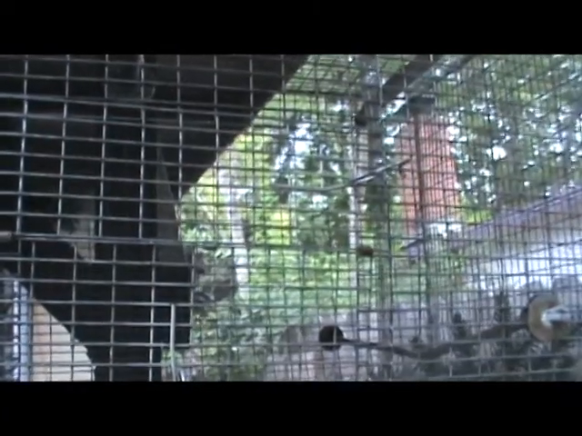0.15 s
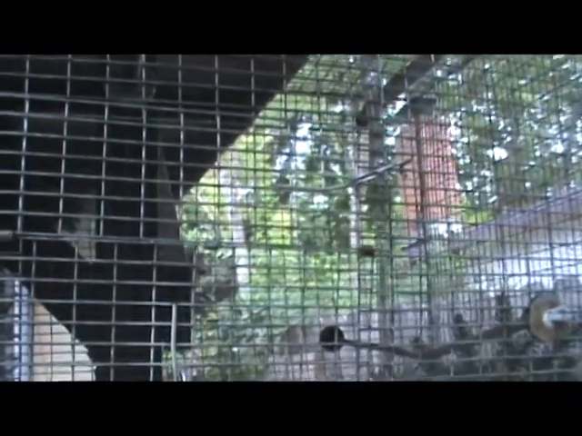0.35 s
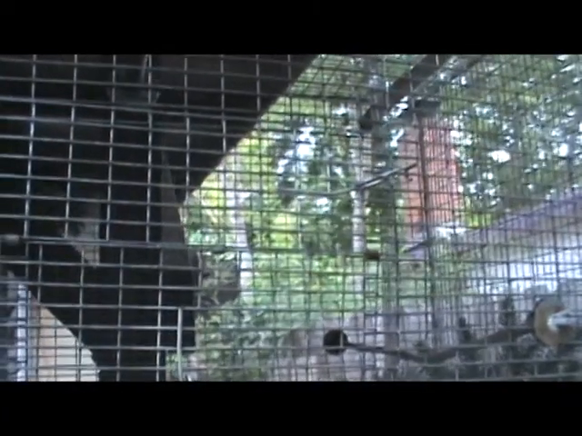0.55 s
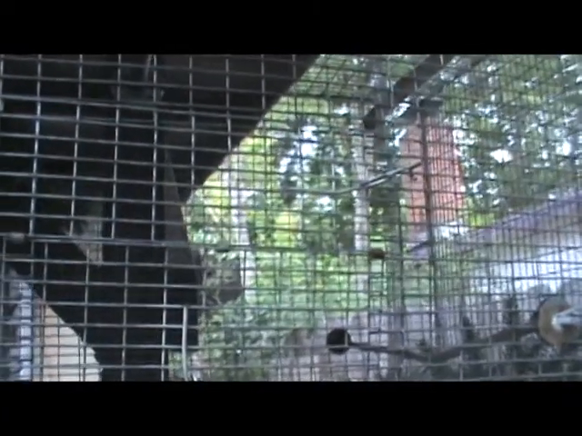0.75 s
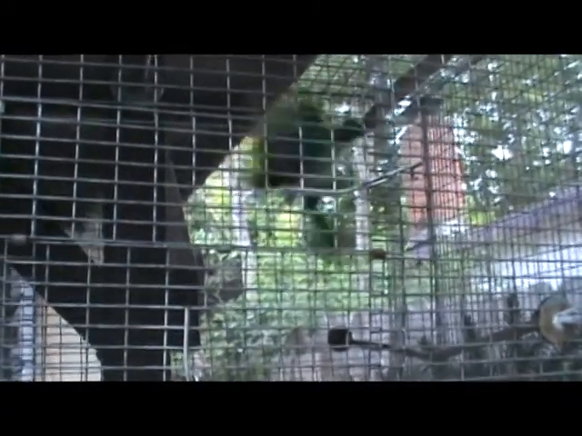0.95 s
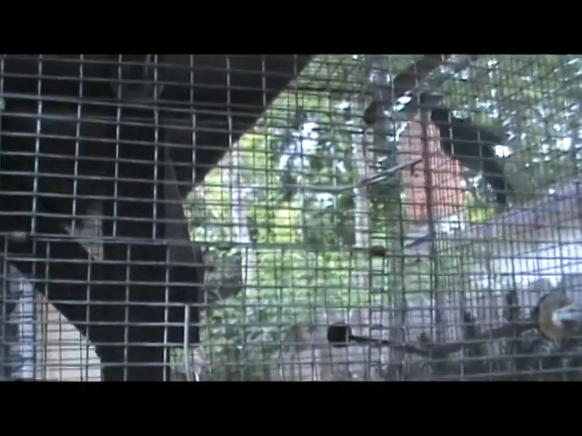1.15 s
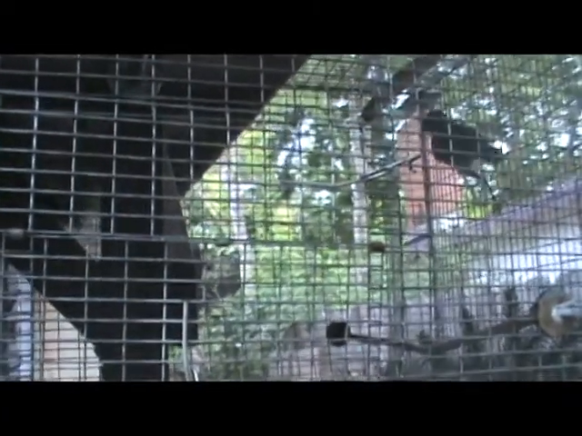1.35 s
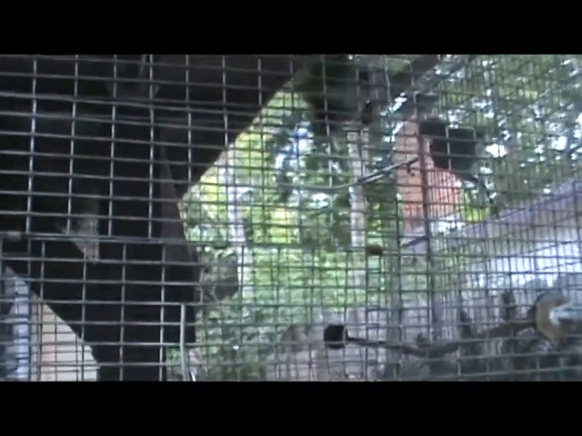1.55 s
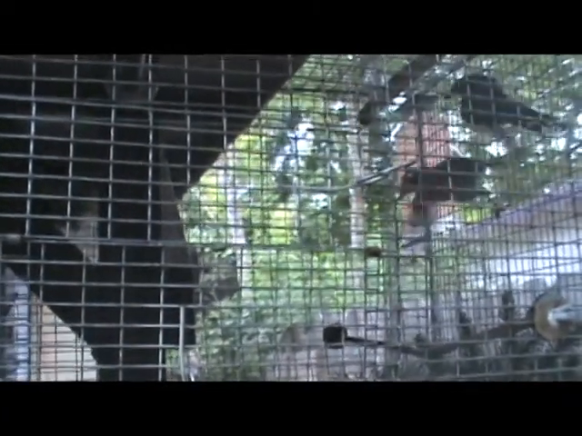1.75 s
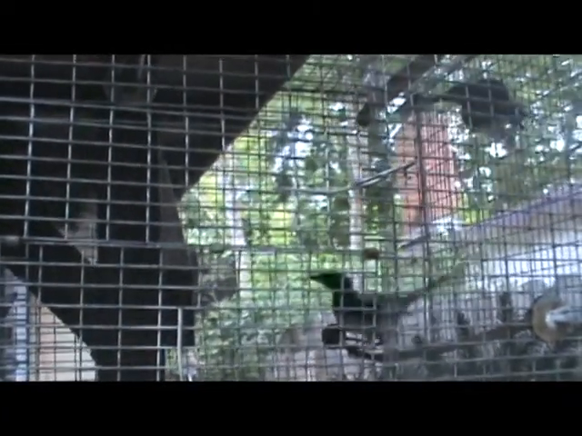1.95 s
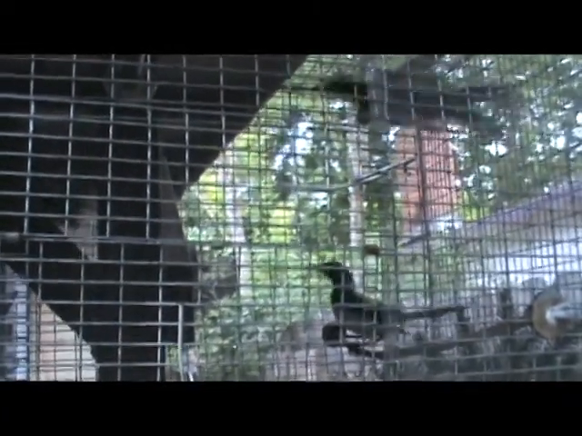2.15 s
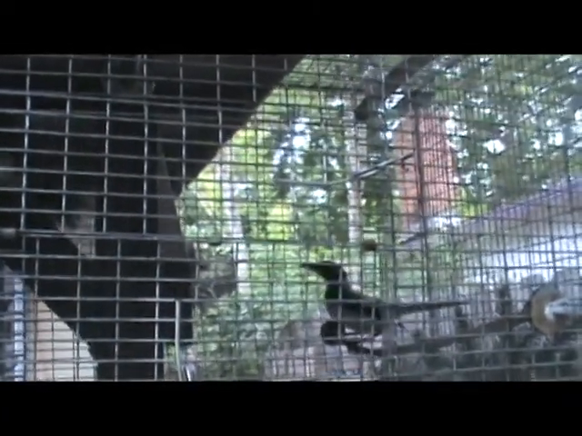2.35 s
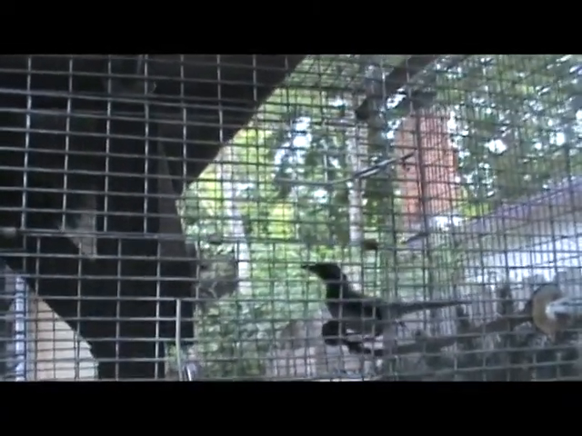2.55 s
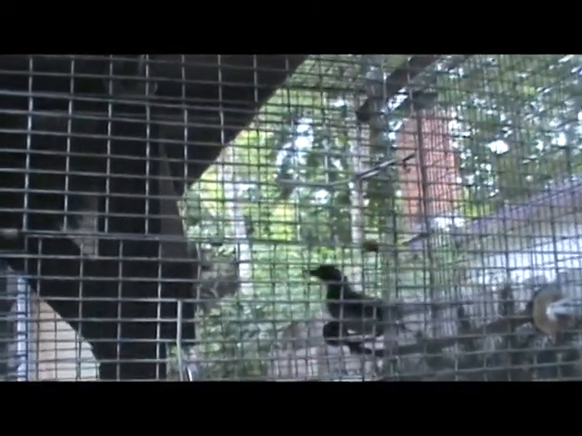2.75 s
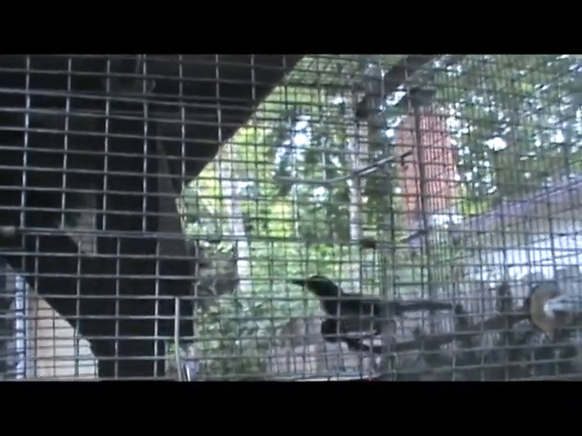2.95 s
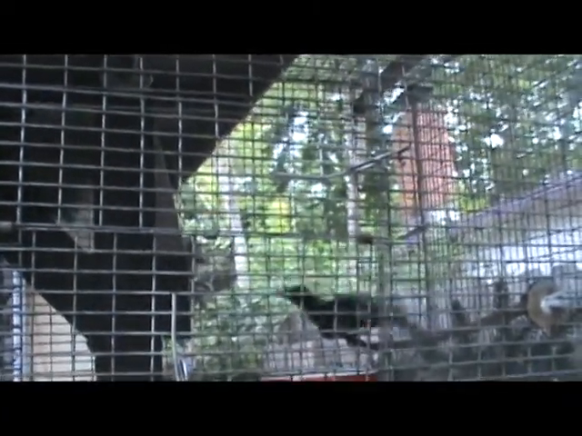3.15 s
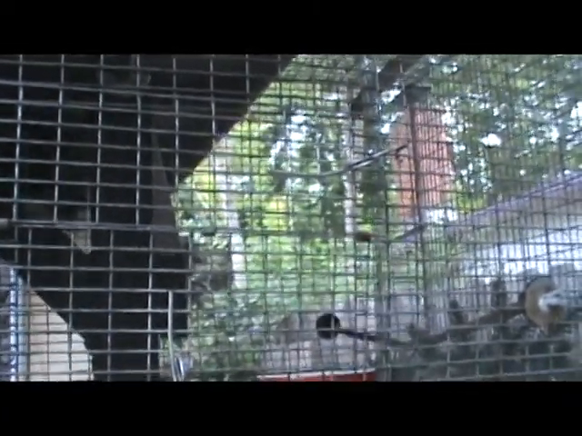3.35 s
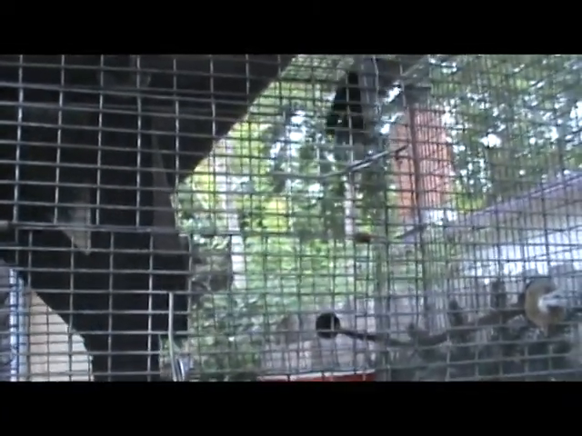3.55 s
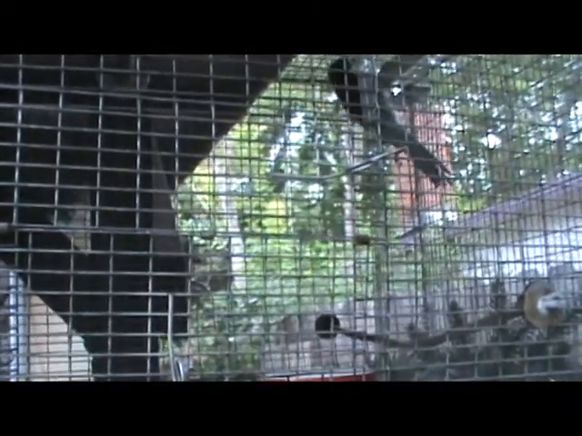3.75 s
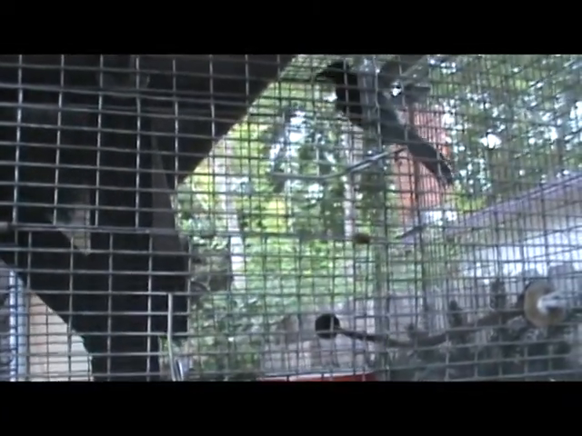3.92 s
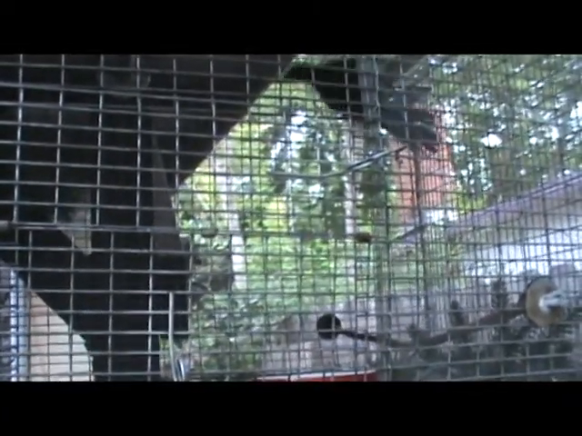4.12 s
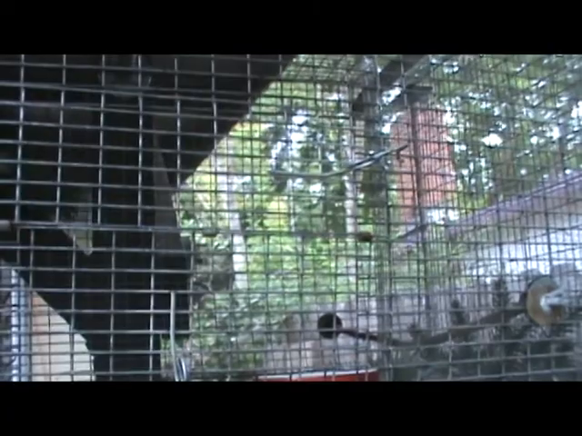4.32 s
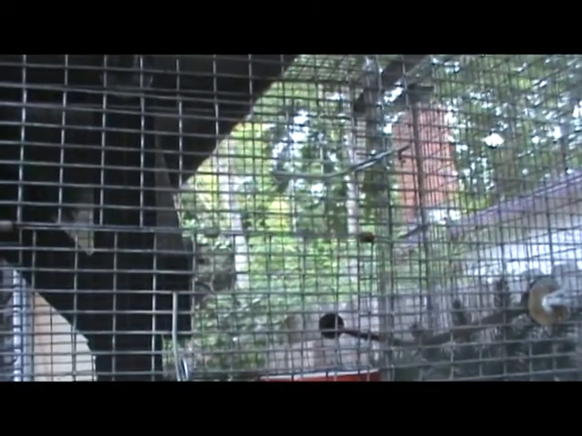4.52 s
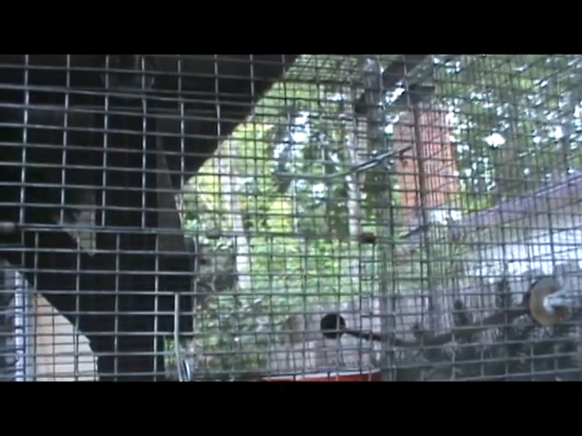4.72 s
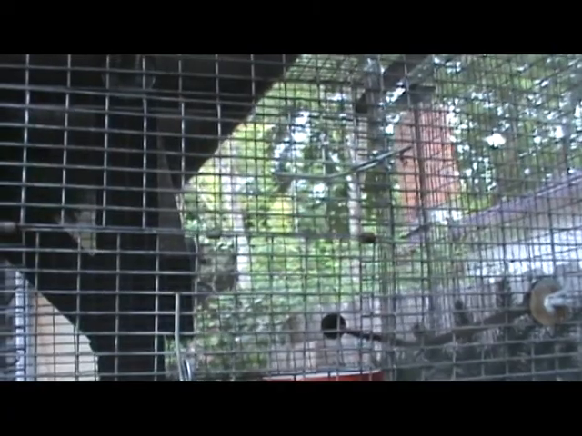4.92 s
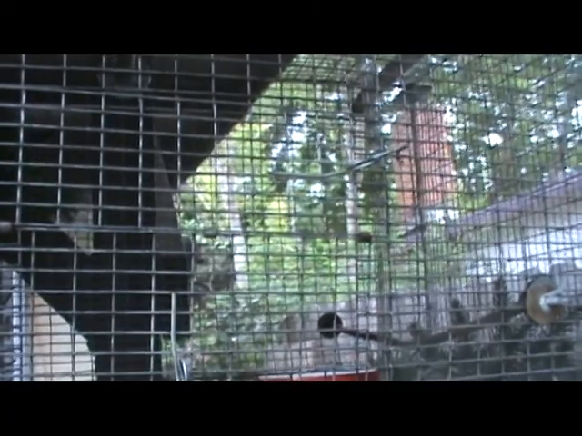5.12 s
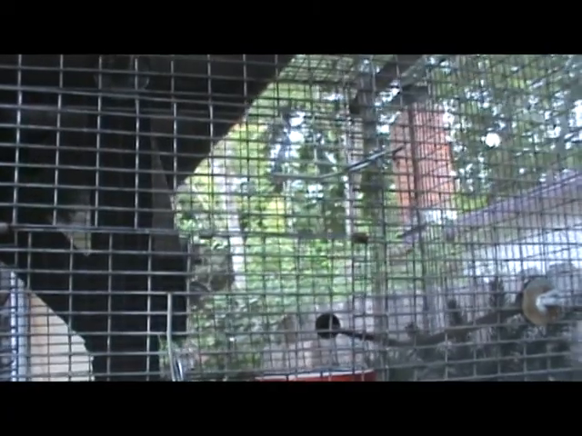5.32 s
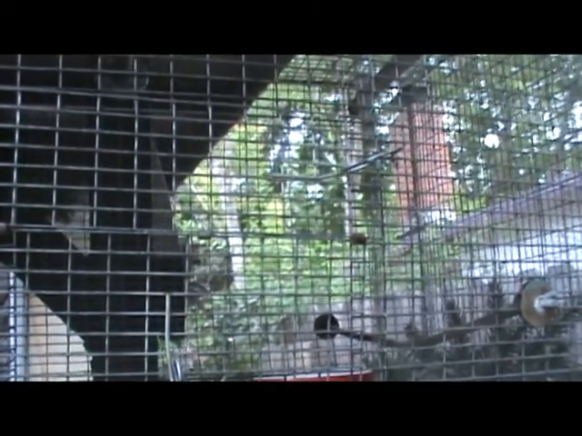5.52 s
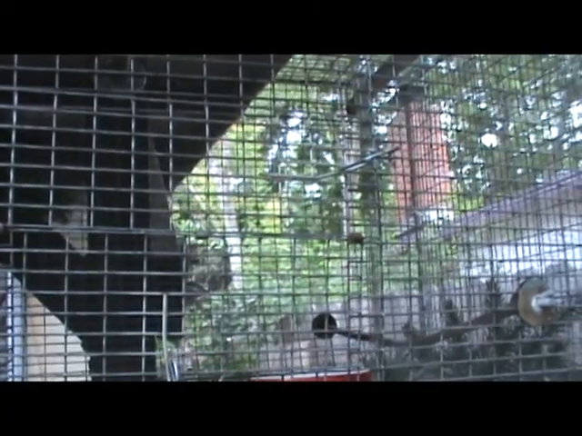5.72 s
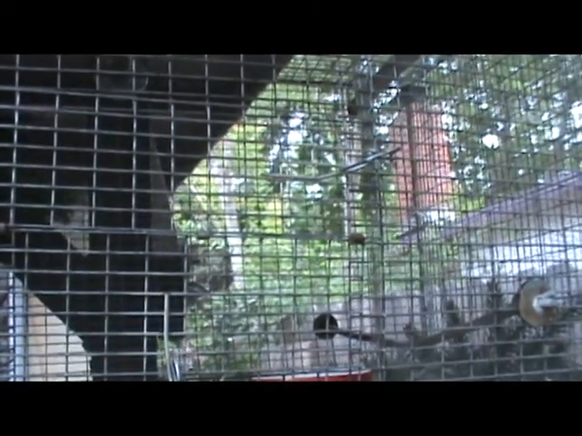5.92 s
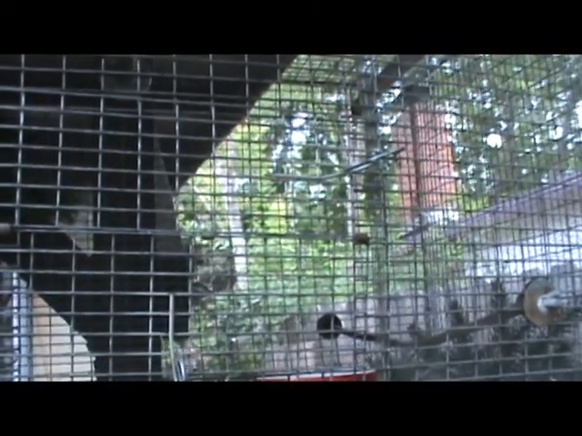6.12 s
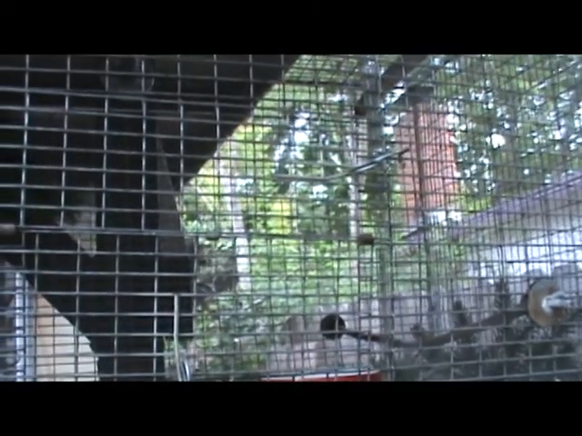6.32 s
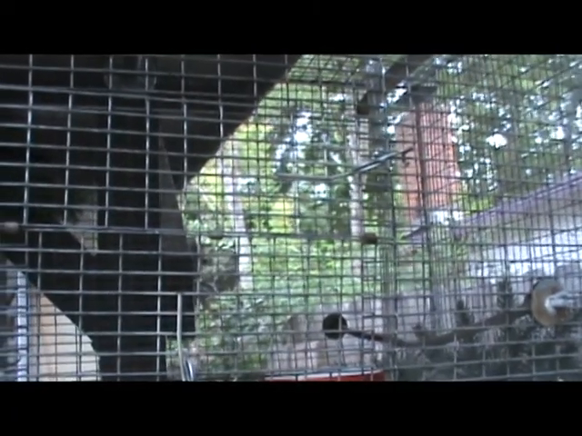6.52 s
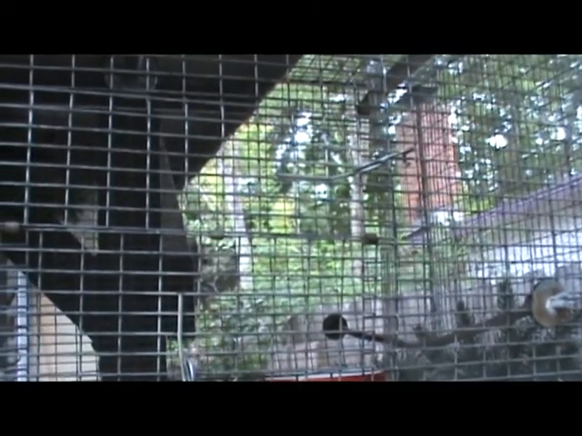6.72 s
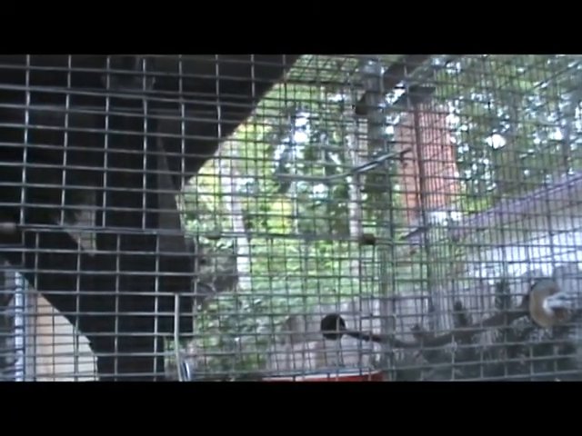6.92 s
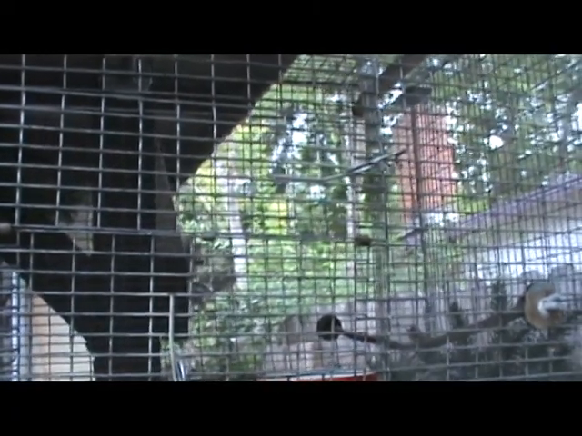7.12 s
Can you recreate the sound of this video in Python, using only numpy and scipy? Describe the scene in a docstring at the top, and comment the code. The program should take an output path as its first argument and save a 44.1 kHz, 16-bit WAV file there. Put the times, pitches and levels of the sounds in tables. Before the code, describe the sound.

Over faint gurgling water outdoors, jays flap and tap around a mesh cage, and one lets out a single short, rasping screech.

```python
"""Water trickles and gurgles behind a roofed wire aviary in a yard, from start to end.
First a jay hits the mesh, which clatters; then wings whirr in short strokes and claws tick on perches.
Two seconds in, one jay's voice box gives a single harsh screech that rises and falls.
The screech pushes an automatic volume control down, and the yard swells back over the next second.
The birds flit about twice more; at the end only the water and the outdoor air are left."""
import sys
import numpy as np
from scipy import signal
from scipy.fft import rfft, irfft
from scipy.io import wavfile
from scipy.ndimage import uniform_filter1d

SR = 44100
rng = np.random.default_rng(int(sys.argv[2]) if len(sys.argv) > 2 else 0)


def put_to_file(sound):
    """Save the sound as 16-bit audio at rate SR, in the file named by the first command-line argument."""
    columns = np.atleast_2d(sound).T  # one column per channel
    safe = np.clip(columns, -1, 1)
    whole_steps = np.round(safe * 32767)
    wavfile.write(sys.argv[1], SR, whole_steps.astype(np.int16))


N = 320607
TOP_HZ = 16300  # upper limit of the sound

# hollows of the water basin that colour the trickle: (frequency [Hz], width [Hz], boost or cut [dB])
BASIN_HOLLOWS = [(108, 19, 7.5), (393, 48, 8.5), (454, 37, -21.5), (517.6, 34, 8.5), (658, 380, -2.5),
                 (788, 17, 9.5), (977, 26, 8), (1700, 22, 5.5), (2062, 33, 11), (2360, 250, -5.5),
                 (2454, 60, 10.5), (4560, 200, 2.5)]


def amp(db):
    """Turns decibels into a number to multiply by."""
    return 10 ** (np.asarray(db) / 20)


def unit(x):
    """Scales a signal to an average strength (rms) of 1."""
    return x / np.sqrt(np.mean(x ** 2) + 1e-20)


def read(points, hz):
    """Looks up hz in a (frequency, value) table, blending between rows on an octave scale."""
    f, value = np.transpose(points)
    return np.interp(np.log(hz + 1), np.log(f + 1), value)


def peaks_db(resonances, hz):
    """The boost or cut that a set of peaks and dips gives at each frequency."""
    return sum(db / (1 + (2 * (hz - f) / width) ** 2) for f, width, db in resonances)


def colour(x, db_at):
    """Filters x by a function that gives dB for each frequency."""
    size = x.shape[-1]
    return irfft(rfft(x) * amp(db_at(np.fft.rfftfreq(size, 1 / SR) + 1)), size)


def band(x, hz, width):
    """Keeps the part of x around hz, at strength 1; it is 10 dB down at width octaves to either side."""
    return unit(colour(x, lambda f: -10 * (np.log2(f / hz) / width) ** 2))


def wobble(size, hz):
    """A smooth random wiggle, up to about hz times a second."""
    return unit(colour(rng.standard_normal(size), lambda f: -10 * np.log10(1 + (f / hz) ** 4)))


def stereo_noise(size, same):
    """Hiss for left and right: unrelated at same=0, identical at same=1."""
    shared, apart = rng.standard_normal((2, size))
    return np.sqrt((1 + same) / 2) * shared + np.sqrt((1 - same) / 2) * np.array([apart, -apart])


def swell(t, rise, fall):
    """A loudness curve that grows until t = 0 and then dies away."""
    return np.exp(np.where(t < 0, -0.5 * (t / rise) ** 2, -t / fall))


def scatter(count):
    """Uneven events with no long pause: rows of (time [s], size [-1 to 1], pitch [0 to 1])."""
    when, size, pitch = rng.random((count, 3)).T
    return np.transpose([(np.arange(count) + when) * N / SR / count, 2 * size - 1, pitch])


def add(mix, s, sound):
    """Mixes a sound in at s seconds."""
    start = round(s * SR)
    sound = sound[..., max(-start, 0):]
    part = mix[:, max(start, 0):][:, :sound.shape[-1]]
    part += sound[..., :part.shape[1]]


def aviary(x, tail_db, near):
    """Sound bounces off the roof and walls, then blurs into a short tail of echoes."""
    # first bounces: (delay [ms], relative left gain, relative right gain)
    echoes = [(1.3, .08, .14), (2.48, .36, .32), (3.75, .04, .15), (7.4, .17, .14), (9.65, .12, .05)]
    # how long the tail takes to fade by 60 dB: (frequency [Hz], time [s])
    fade_times = [(200, 0.094), (2000, 0.32), (4000, 0.34), (8000, 0.33), (15000, 0.35)]
    bounces = rng.choice([-1., 1.], (2, SR // 2)) * (rng.random((2, SR // 2)) < 0.12)
    hz, t, spectrum = signal.stft(bounces, SR, nperseg=256)
    decay = 10 ** (-3 * t / read(fade_times, hz)[:, None])
    tail = signal.istft(spectrum * decay * (1 - np.exp(-t / 0.0026)), SR, nperseg=256)[1]
    tail = colour(tail, lambda f: -10 * np.log10(1 + (250 / f) ** 2))  # bass escapes through the mesh
    response = amp(tail_db) * tail / np.linalg.norm(tail[0])
    response[:, 0] += 1  # the direct sound
    for ms, left, right in echoes:
        response[:, round(ms * SR / 1000)] += near * np.array([left, right])
    return signal.fftconvolve(x, response, axes=1)[:, :N]


def yard(level_db=-47.5, patchy_db=2.38, flicker_db=2.04):
    """Outdoor air and the wash of trickling water, in drifting patches that flicker in the treble."""
    # tone of the air and water: (frequency [Hz], level [dB])
    tone = [(12, -42), (22, -10.5), (45, -7), (100, -10), (200, -8.5), (300, -8), (400, -5), (700, -9.5),
            (2000, -11.5), (2800, -13), (4200, -18.5), (10500, -19), (13000, -23.5), (16000, -26)]
    # how alike left and right are: (frequency [Hz], likeness [0 to 1])
    likeness = [(30, 1), (150, 0.89), (500, 0.84), (1200, 0.64), (3000, 0.47), (8000, 0.33), (16000, 0.79)]
    frames, hz = N // 512 + 5, np.fft.rfftfreq(2048, 1 / SR)
    a, b, c, d, patches, flicker = rng.standard_normal((frames, len(hz), 6)).T
    left, apart = a + 1j * b, c + 1j * d  # two unrelated noise spectra
    same = read(likeness, hz)[:, None]
    spectrum = np.array([left, same * left + np.sqrt(1 - same ** 2) * apart])
    patches = unit(uniform_filter1d(uniform_filter1d(patches, size=36, axis=0), size=5, axis=1))
    flicker = unit(uniform_filter1d(uniform_filter1d(flicker, size=400, axis=0), size=2, axis=1))
    treble = (hz / (hz + 500))[:, None]  # the low air is steadier than the spray
    steady_db = read(tone, hz) + peaks_db(BASIN_HOLLOWS, hz)
    spectrum *= amp(steady_db[:, None] + treble * (patchy_db * patches + flicker_db * flicker))
    wash = unit(signal.istft(spectrum, nperseg=2048, noverlap=1536)[1][:, :N])
    return amp(level_db) * wash * amp([[0.45], [-0.45]])  # slightly to the left


def splashes(gain_db=-1, spread_db=2):
    """Small splashes of water hiss up quickly and die away, each around its own pitch."""
    # the main splashes: (time [s], level [dB], centre [Hz], width [octaves])
    main = [(.07, -48, 2400, 0.24), (.41, -42.5, 2600, 0.61), (.69, -49, 8860, 0.27),
            (.765, -45, 1250, 0.32), (1.236, -42.5, 2060, .39), (1.318, -48, 2030, 0.44),
            (1.384, -46, 2000, .36), (5.36, -47.5, 6900, .97), (5.515, -45.5, 1370, 0.71),
            (5.612, -46.5, 2180, .99), (5.709, -47.5, 1710, 0.16), (5.745, -49, 1880, .97),
            (5.75, -48.5, 10400, .65), (6.54, -47.5, 910, 0.29), (6.879, -49, 2660, .33),
            (7.178, -49, 3350, 0.27)]
    out, t = np.zeros((2, N)), np.arange(-1024, 11264) / SR
    plops = [(s, -48.5 + spread_db * size, 1500 * (3100 / 1500) ** pitch, 0.1)
             for s, size, pitch in scatter(count=8)]
    spray = [(s, -53 + spread_db * size, 7500 * (11500 / 7500) ** pitch, 0.8)
             for s, size, pitch in scatter(count=5)]
    shape = swell(t, rise=0.0058, fall=0.032)
    for s, db, hz, width in list(main) + plops + spray:
        hiss = colour(stereo_noise(len(t), same=0.78), lambda f: peaks_db(BASIN_HOLLOWS, f))
        add(out, s + t[0], amp(db + gain_db) * band(hiss, hz, width) * shape)
    return out


def gurgles(gain_db=-1, delay_s=0.0019):
    """Big bubbles ring for a few cycles each; many smaller ones fill in between."""
    # the loudest bubbles: (time [s], level [dB], pitch [Hz])
    big = [(0.011, -35, 384), (1.203, -35, 365), (1.416, -35.5, 378), (1.999, -39, 520), (2.599, -41, 386),
           (4.471, -36.5, 518), (4.651, -39, 510), (5.306, -38, 378), (5.735, -41, 520), (6.741, -41, 426),
           (7.171, -38.5, 400)]
    out, t = np.zeros((2, N)), np.arange(-512, 3072) / SR
    # medium bubbles ring near the two main hollows of the basin
    medium = [(s, -42 + 0.3 * size, (369 if pitch < 0.5 else 518) * (1 - 0.036 * size))
              for s, size, pitch in scatter(count=28)]
    small = [(s, -48.5 + 3 * size, 330 + 220 * pitch) for s, size, pitch in scatter(count=120)]
    shape = swell(t, rise=0.0032, fall=0.0096)
    for s, db, hz in list(big) + medium + small:
        ring = np.sin(2 * np.pi * (hz * t + rng.random()))
        add(out, s + delay_s + t[0], amp(db + gain_db) * shape * ring)
    return out


def ticks():
    """A claw or beak taps a perch or the mesh with a hard, dry tick."""
    # the taps: (time [s], level [dB], fade time [s], centre [Hz], half width [octaves])
    taps = [(1.0799, -19.5, 0.00069, 6000, 1.6), (1.5326, -31, .0008, 9000, 1),
            (1.622, -17, 0.0012, 11100, 0.84), (1.653, -39, .0008, 9000, 1.2),
            (3.275, -35, 0.001, 11000, 0.84), (3.574, -34, .0007, 11000, .8),
            (3.658, -36, .003, 7540, 0.93), (3.689, -33, 0.0062, 6240, 0.53),
            (5.625, -38, 0.0052, 10000, 0.65)]
    out, t = np.zeros((2, N)), np.arange(2048) / SR
    for s, db, decay, hz, half_width in taps:
        hiss = band(stereo_noise(len(t), same=0.94), hz, 2 * half_width)
        add(out, s, amp(db) * hiss * np.exp(-t / decay))
    return out


def clatter(start_s=0.1575, attack_s=0.0027, buzz_db=-23, ring_gain_db=1):
    """A bird strikes the mesh: the wires buzz against each other and the frame rings briefly."""
    # how mesh and frame ring: (frequency [Hz], width [Hz], level [dB], fade time [s])
    mesh_rings = [(524, 270, -41.5, 0.05), (1420, 180, -39.5, 0.039), (2170, 630, -31, 0.015),
                  (4120, 2300, -30.5, 0.018), (6500, 1200, -32, 0.018), (7800, 400, -31, 0.0098),
                  (9300, 2400, -21.5, 0.0088)]
    out, t = np.zeros((2, N)), np.arange(8192) / SR
    buzz = amp(buzz_db) * band(stereo_noise(len(t), same=0.74), hz=9000, width=0.79) * np.exp(-t / 0.011)
    ring = 0
    for hz, width, db, decay in mesh_rings:
        hiss = band(stereo_noise(len(t), same=0.92), hz, 2 * width / hz)
        ring += amp(db + ring_gain_db) * hiss * np.exp(-t / decay)
    add(out, start_s, (buzz + ring) * (1 - np.exp(-(t / attack_s) ** 2)))
    return out


def rustle(t, rise, fall, db_per_octave, grain_db=3.3):
    """Feathers drag over each other in a grainy hiss that swells and dies away, a little to the left."""
    # tone of the feathers: (frequency [Hz], level [dB])
    tone = [(300, -9), (1000, -1.5), (2000, -1.5), (4000, -1), (6000, -3.5), (8000, -1), (10500, 3.5),
            (13000, -1), (16000, -17)]
    hiss = stereo_noise(len(t), same=0.88)
    hiss = colour(hiss, lambda f: read(tone, f) + db_per_octave * np.log2(f / 8000))
    grain = amp(grain_db * wobble(len(t), hz=850))
    return swell(t, rise, fall) * unit(hiss * grain) * amp([[0.6], [-0.6]])


def wings(gain_db=-1, rise_share=0.38):
    """Each beat rustles and pushes a soft puff of air; feathers that hit something rustle abruptly."""
    # wingbeats: (peak time [s], feather level [dB], length [s], air level [dB])
    beats = [(0.984, -40, 0.047, -46.5), (1.036, -36.5, 0.024, -37.5), (1.089, -37.5, 0.03, -37.5),
             (1.13, -42, .024, -55), (1.496, -37, 0.03, -45.5), (1.528, -40, 0.014, -52),
             (1.576, -26, .013, -45), (1.63, -33, 0.023, -39.5), (1.726, -42.5, .06, -51.5),
             (1.806, -41, 0.019, -50), (2.458, -38, 0.023, -50.5), (3.281, -41, 0.047, -48),
             (3.368, -32.5, 0.019, -61), (3.416, -29, 0.032, -36), (3.477, -26.5, 0.023, -37),
             (3.529, -27.5, 0.028, -40), (3.601, -34.5, 0.023, -52), (3.638, -41.5, 0.023, -60),
             (4.19, -36, 0.032, -48.5), (4.248, -31, 0.019, -44), (4.358, -27.5, 0.02, -46.5)]
    # tone of the puff of air: (frequency [Hz], level [dB])
    puff_tone = [(20, -1), (50, 0.5), (120, 0), (250, -0.5), (500, -0.5), (1000, -6), (2000, -13.5),
                 (6000, -27)]
    # feathers slapping perch and mesh: (time [s], level [dB], fade time [s])
    slaps = [(0.817, -37, 0.0093), (1.955, -35.5, 0.0093), (3.399, -27, .006), (3.458, -31, .008),
             (3.521, -27, 0.012), (3.583, -31, 0.021), (4.15, -36, 0.0064), (4.169, -32.5, 0.0027),
             (4.267, -35, .008), (4.333, -22.5, .017)]
    out, t = np.zeros((2, N)), np.arange(-4096, 8192) / SR
    for s, feather_db, length, air_db in beats:
        feathers = rustle(t, rise_share * length, (1 - rise_share) * length, db_per_octave=1)
        air = unit(colour(stereo_noise(len(t), same=1), lambda f: read(puff_tone, f)))
        puff = air * np.exp(-0.5 * (t / (0.0091 + length / 3)) ** 2)
        add(out, s + t[0], amp(feather_db) * feathers + amp(air_db) * puff)
    for s, db, decay in slaps:
        add(out, s + t[0], amp(db) * rustle(t, rise=0.0026, fall=decay, db_per_octave=1.15))
    return amp(gain_db) * out


def whistle(hz, rough, flutter):
    """The jay's voice box whistles; flutter and random shaking bend the pitch and smear the overtones."""
    # tone of the throat: (frequency [Hz], level [dB])
    throat = [(1800, -6.5), (2700, -0.5), (4000, 0.5), (5000, 2), (5900, 1.5), (7500, -5), (10000, 1),
              (12000, -10), (16000, -34)]
    bend = np.sqrt(rough) * (0.087 * flutter + 0.14 * wobble(len(hz), hz=720))
    phase = 2 * np.pi * np.cumsum(hz * (1 + bend)) / SR
    overtones = sum(np.sin(k * phase) * (2 / k) ** 0.94 * (k * hz < TOP_HZ) for k in range(2, 7))
    strength = amp(5 + 17 * rough - 27 * np.log2(hz / 1990))  # most overtones when low and rough
    note = (np.sin(phase) + strength * overtones) / np.sqrt(0.5 + strength ** 2)
    return unit(colour(note, lambda f: read(throat, f)))


def rasp(t, hz, rough, tighten_s=0.038):
    """The harsh hiss in the voice: it loses its low end as the voice box tightens."""
    # tone of the rasp: (frequency [Hz], level [dB])
    tone = [(1000, -5), (2000, -1.5), (3000, 4.5), (4100, 10.5), (5000, 0), (6000, -5), (7300, -6.5),
            (8500, -3), (10200, -6), (11800, -11), (14000, -16), (16000, -40)]
    lowest_hz = 0.99 * hz * (1 - 0.66 * np.exp(-np.maximum(t, 0) / tighten_s))
    db_per_octave = -0.5 * rough + 7.5 * (1 - rough)  # brighter as the voice clears
    f, frame_s, spectrum = signal.stft(stereo_noise(len(t), same=0.48), SR, nperseg=256)
    f, frame_s = f[:, None] + 1, frame_s + t[0]
    spectrum *= amp(read(tone, f) + np.interp(frame_s, t, db_per_octave) * np.log2(f / 5000))
    spectrum /= np.sqrt(1 + (np.interp(frame_s, t, lowest_hz) / f) ** 14)
    return unit(signal.istft(spectrum, SR, nperseg=256)[1][:, :len(t)])


def screech(start_s=2.0245, hold_s=0.25, attack_s=0.0045, release_s=0.0086, flutter_hz=390):
    """A fast, uneven flutter shakes the voice, which starts as a rasp and clears towards a whistle."""
    # the pitch, one slow climb and a quick fall: (time [s], pitch [Hz])
    melody = [(2.025, 1947), (2.09, 2010), (2.125, 2090), (2.155, 2500), (2.18, 3624), (2.205, 3830),
              (2.222, 3680), (2.234, 2763), (2.26, 2001), (2.283, 1925)]
    out, t = np.zeros((2, N)), np.arange(-0.009, hold_s + 10 * release_s, 1 / SR)
    hz = np.interp(start_s + t, *np.transpose(melody))
    attack = np.clip(t / attack_s, amp(-29), 1)  # a faint grate, then a sudden start
    sag = amp(-6.5 - 14 * t)
    release = np.exp(-np.maximum(t - hold_s, 0) / release_s)
    rough = np.interp(t, [0, hold_s], [0.9, 0.32])
    flutter_rate = flutter_hz * (1 + 0.26 * wobble(len(t), hz=208.6))
    flutter = np.sin(2 * np.pi * np.cumsum(flutter_rate) / SR)
    voice = np.sqrt(1 - rough ** 2) * whistle(hz, rough, flutter) + rough * rasp(t, hz, rough)
    add(out, start_s + t[0], attack * sag * release * voice * (1 + 0.42 * flutter))
    return out


def calling_jay():
    """The screech rings in the roofed corner on the left, where the caller sits."""
    # how the corner rings: (frequency [Hz], width [Hz], boost or cut [dB])
    corner = [(1630, 300, -3), (1950, 140, 11), (3530, 120, 3), (3700, 84, 5.5), (3770, 260, -2.5),
              (4130, 290, 3), (5030, 290, -2), (5730, 99, 9.5), (6100, 110, 3), (6600, 290, 5.5),
              (7270, 370, 8), (9700, 500, 2.5)]
    # how much louder the left side is: (frequency [Hz], left minus right [dB])
    side = [(700, 3), (1300, 1), (2500, 6), (4200, 5), (6000, 3), (8000, 4.5), (12000, 0)]
    left, right = aviary(colour(screech(), lambda f: peaks_db(corner, f)), tail_db=-7.5, near=0.71)
    return np.array([colour(left, lambda f: read(side, f) / 2),
                     colour(right, lambda f: -read(side, f) / 2)])


def scene():
    """The caller to the left, the flitting birds ahead, the water behind."""
    jay = amp(-2.5) * calling_jay()
    birds = aviary(wings() + ticks() + clatter(), tail_db=-11, near=0.13)
    water = aviary(gurgles() + splashes(), tail_db=-9, near=0.092)
    mix = jay + birds + water + yard()
    # the two microphones sit close together, so they share the bass
    middle = mix.mean(0)
    return middle + colour(mix - middle, lambda f: -10 * np.log10(1 + (130 / f) ** 2))


def volume_control(x, threshold_db, squeeze, fall_db_per_s):
    """Follows how far peaks pass the threshold, lets that fall, and turns down by a share (squeeze)."""
    power_db = 10 * np.log10(abs(uniform_filter1d((x ** 2).mean(0), size=200)) + 1e-12)
    fall = np.arange(N) / SR * fall_db_per_s
    held_db = np.maximum.accumulate(power_db + fall) - fall
    over_db = np.maximum(held_db - threshold_db, 0)
    return x / amp(squeeze * uniform_filter1d(over_db, size=80))


def record(dry, ceiling=0.96):
    """Turns loud moments down, slow stage then fast, rounds the tallest peaks and cuts the top treble."""
    sound = volume_control(dry, threshold_db=-23, squeeze=0.22, fall_db_per_s=8.5)
    sound = volume_control(sound, threshold_db=-15.5, squeeze=1, fall_db_per_s=122)
    sound = sound / (1 + (sound / ceiling) ** 8) ** (1 / 8)
    treble_cut = signal.firwin(511, TOP_HZ, window=("kaiser", 9), fs=SR)
    return signal.oaconvolve(sound, treble_cut[None], "same")


dry = scene()
out = record(dry)
put_to_file(out)
```